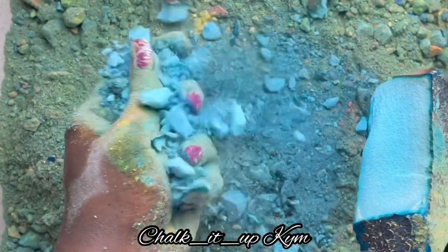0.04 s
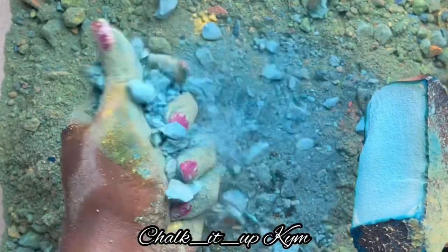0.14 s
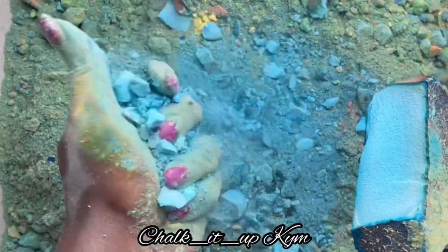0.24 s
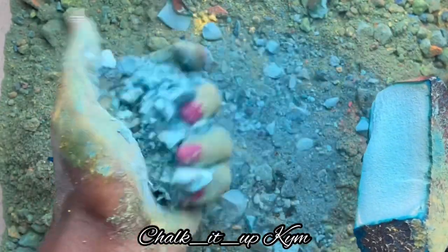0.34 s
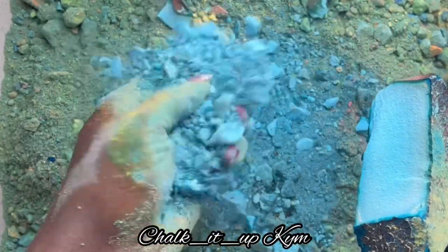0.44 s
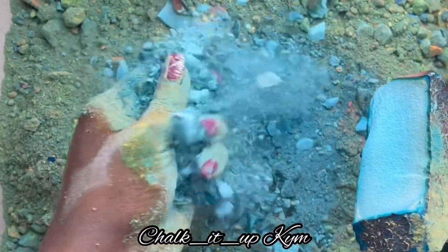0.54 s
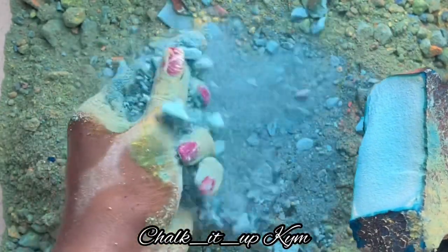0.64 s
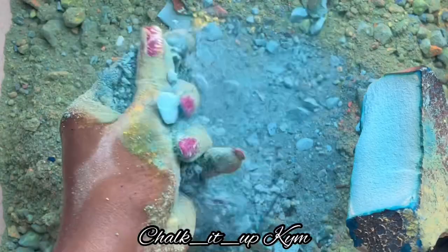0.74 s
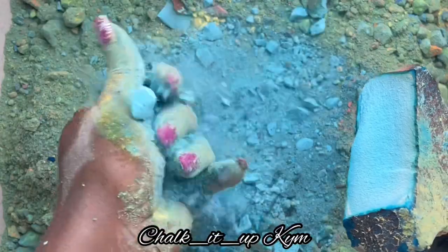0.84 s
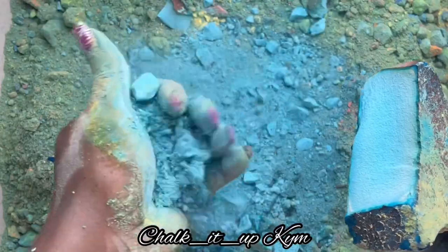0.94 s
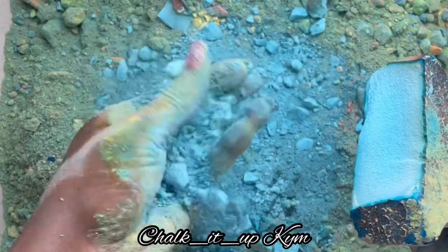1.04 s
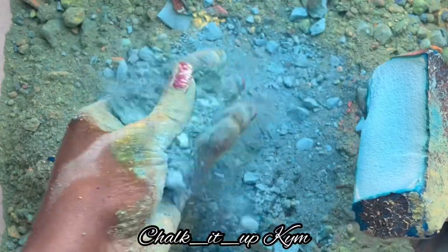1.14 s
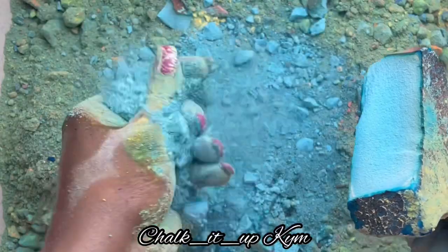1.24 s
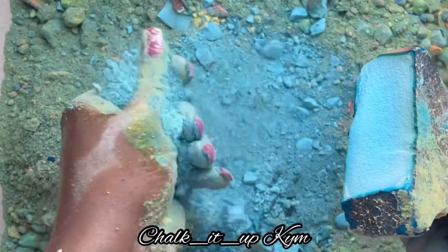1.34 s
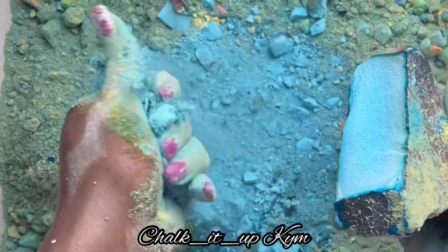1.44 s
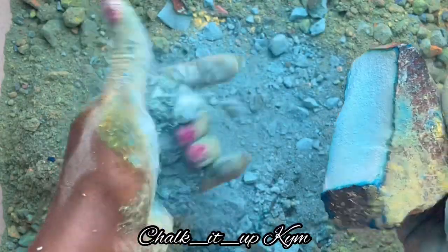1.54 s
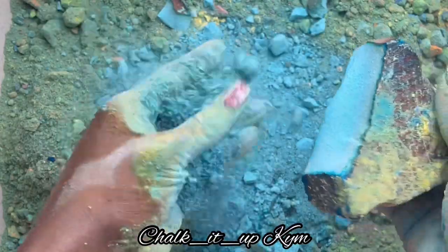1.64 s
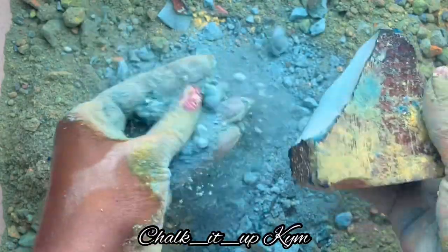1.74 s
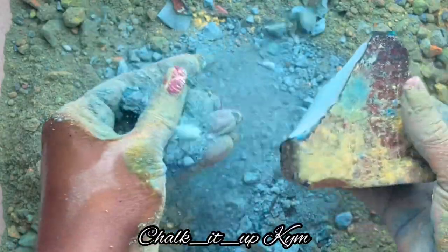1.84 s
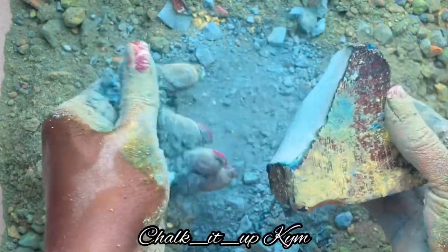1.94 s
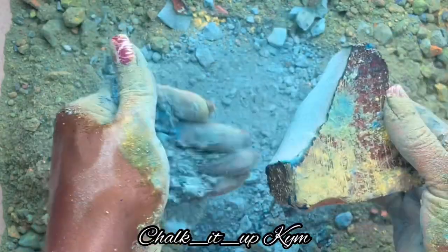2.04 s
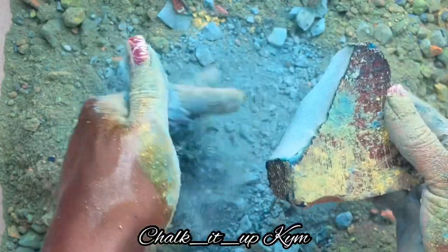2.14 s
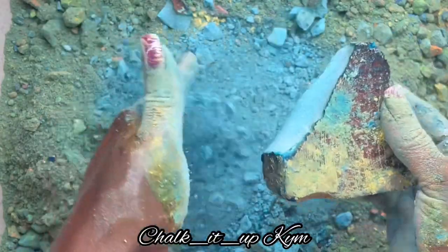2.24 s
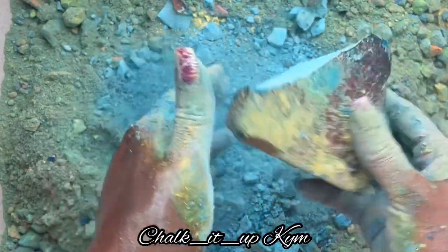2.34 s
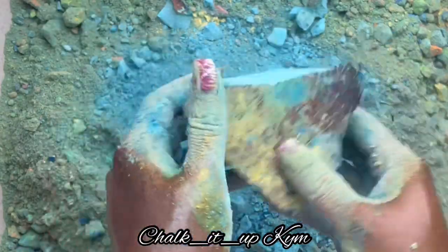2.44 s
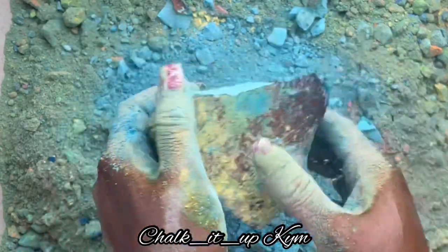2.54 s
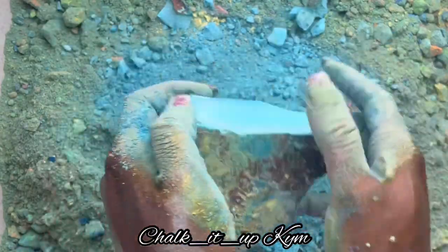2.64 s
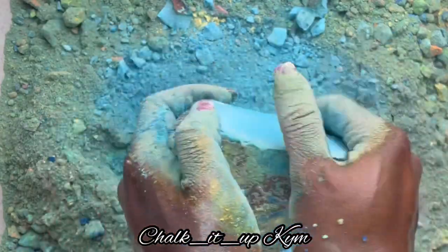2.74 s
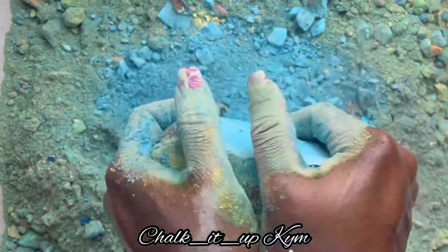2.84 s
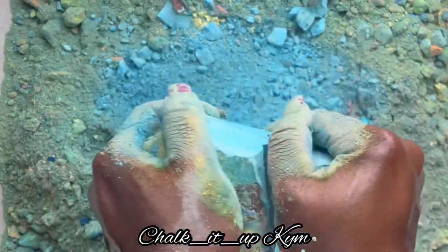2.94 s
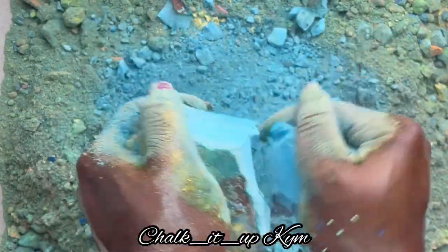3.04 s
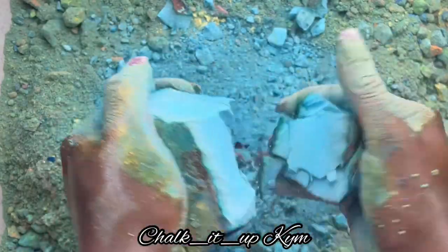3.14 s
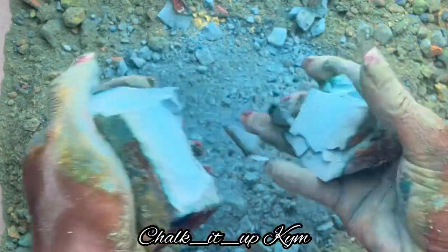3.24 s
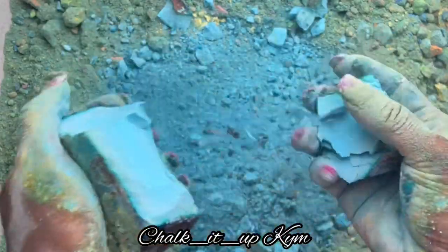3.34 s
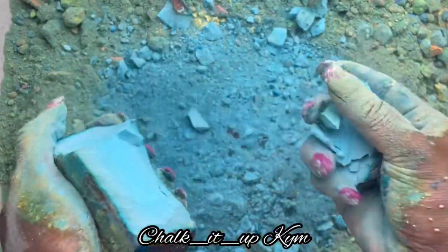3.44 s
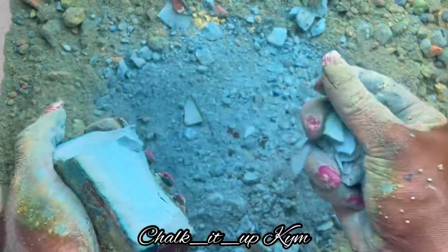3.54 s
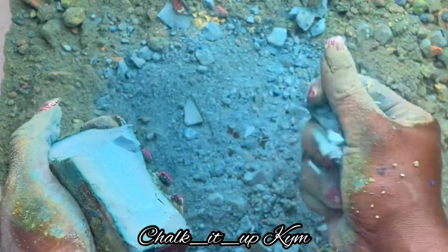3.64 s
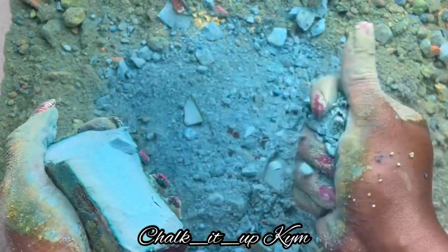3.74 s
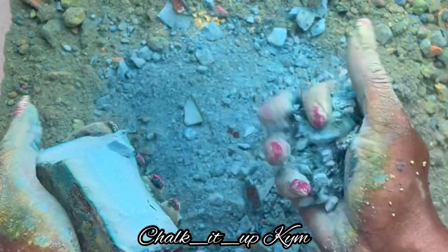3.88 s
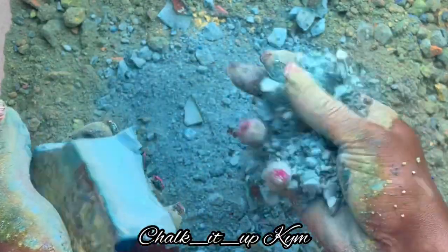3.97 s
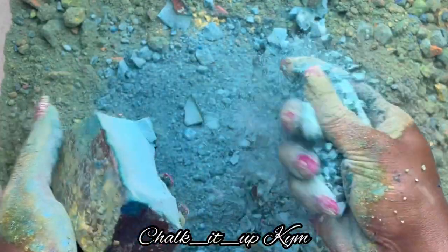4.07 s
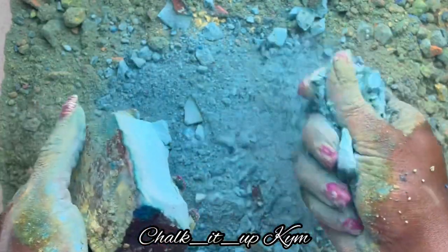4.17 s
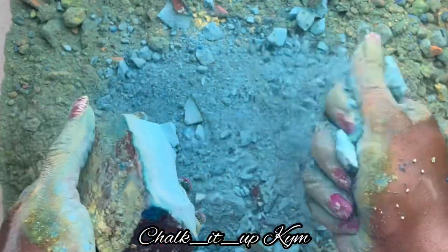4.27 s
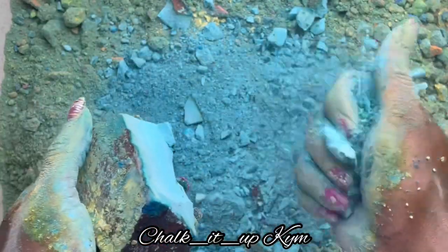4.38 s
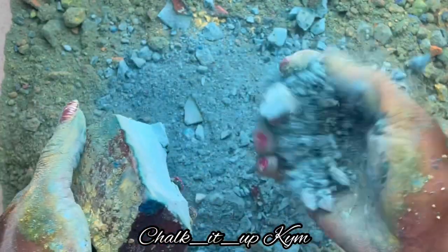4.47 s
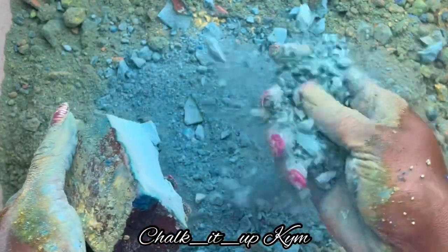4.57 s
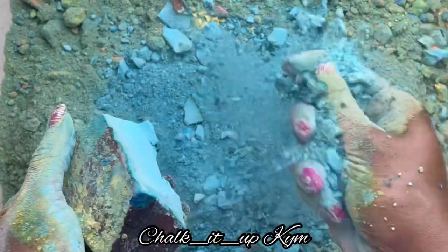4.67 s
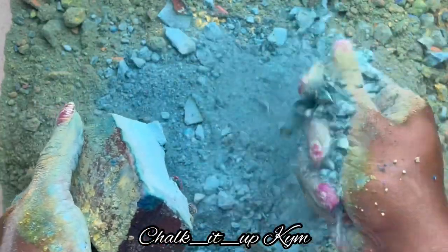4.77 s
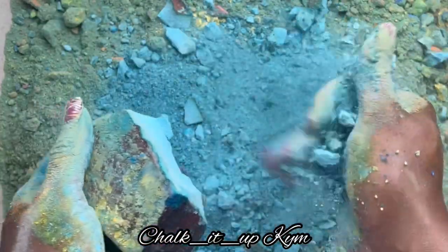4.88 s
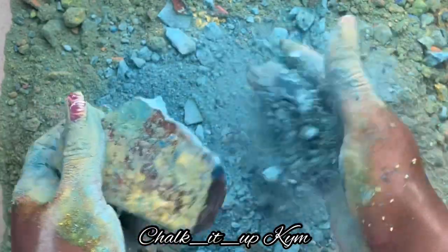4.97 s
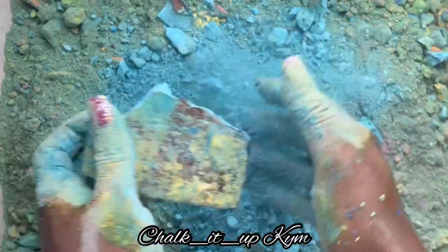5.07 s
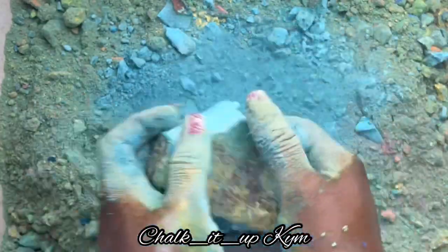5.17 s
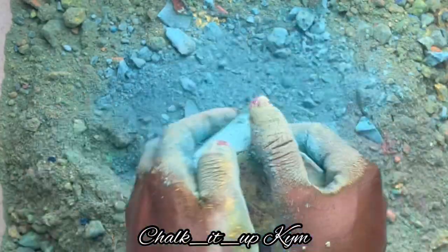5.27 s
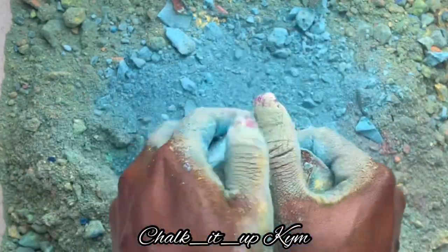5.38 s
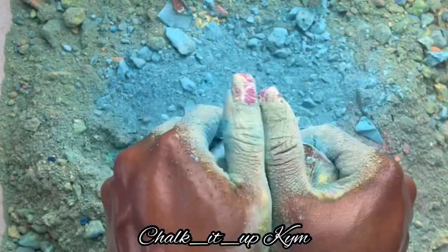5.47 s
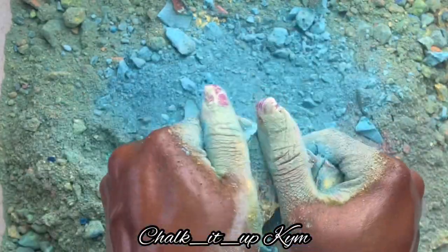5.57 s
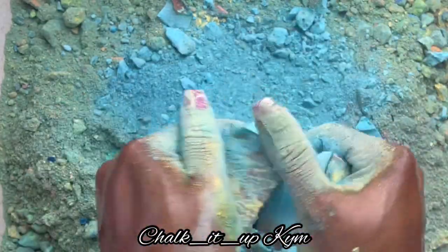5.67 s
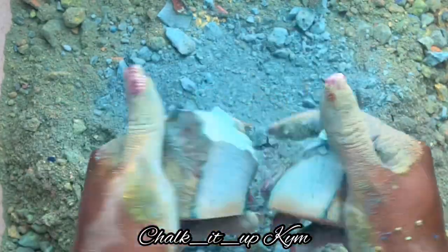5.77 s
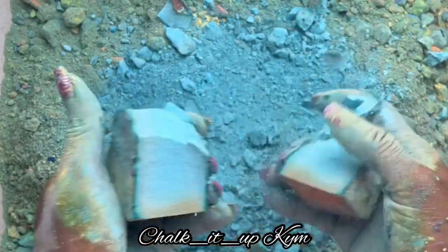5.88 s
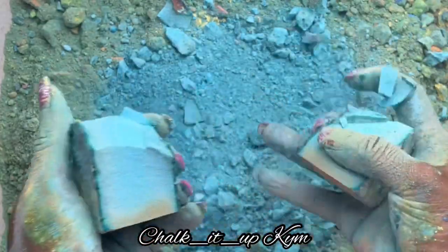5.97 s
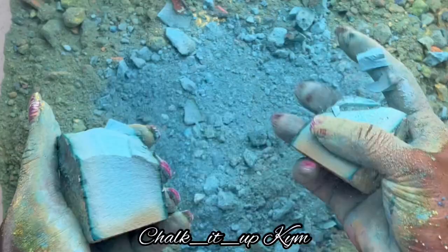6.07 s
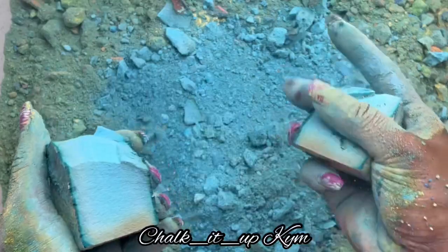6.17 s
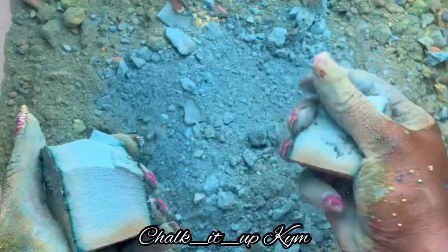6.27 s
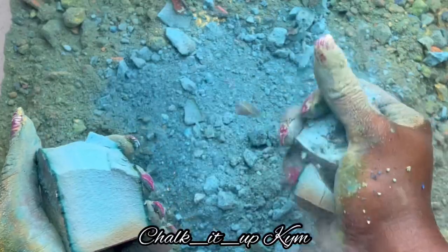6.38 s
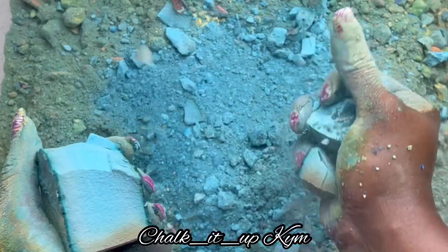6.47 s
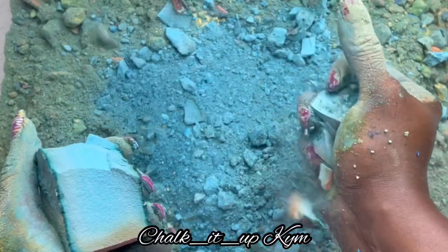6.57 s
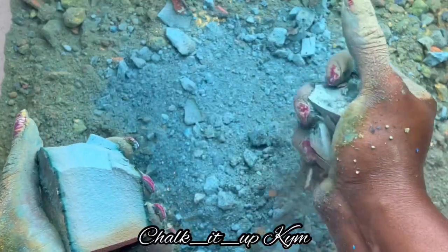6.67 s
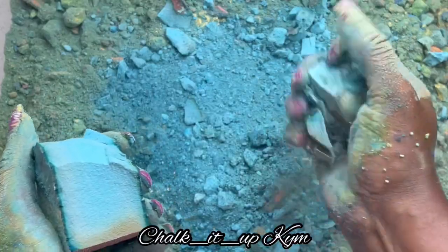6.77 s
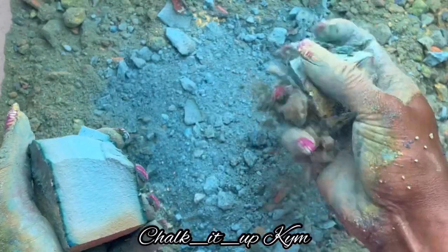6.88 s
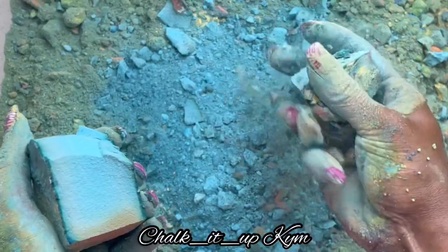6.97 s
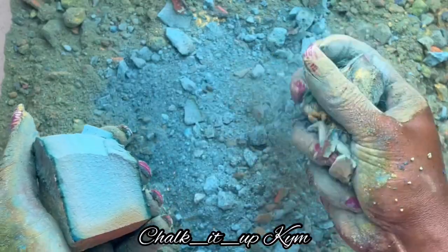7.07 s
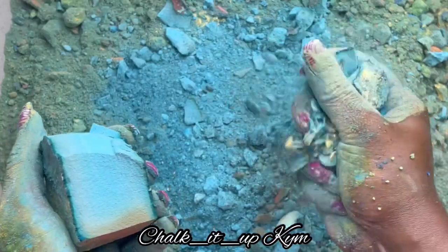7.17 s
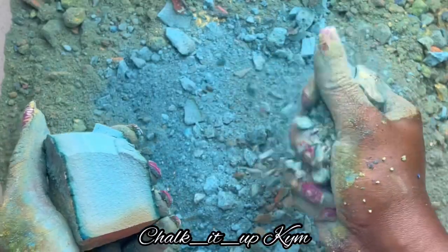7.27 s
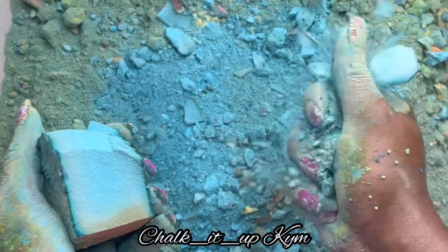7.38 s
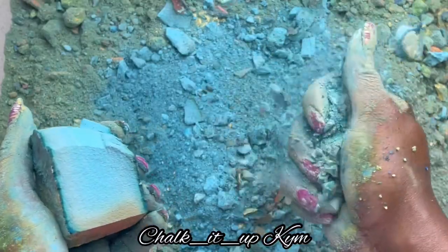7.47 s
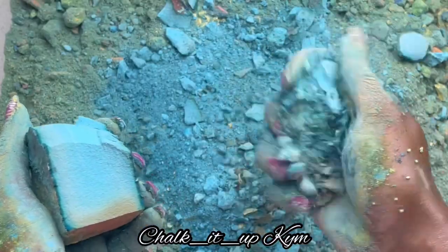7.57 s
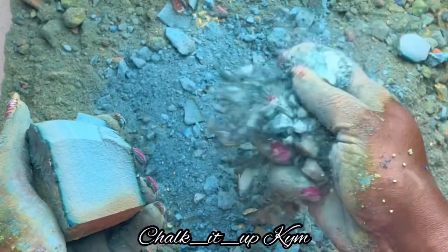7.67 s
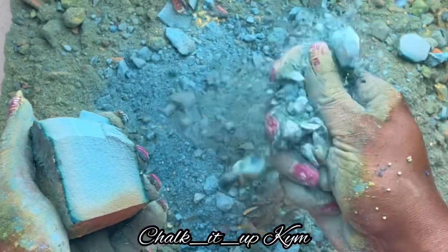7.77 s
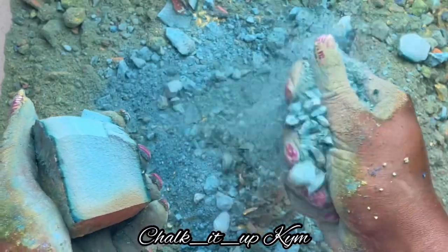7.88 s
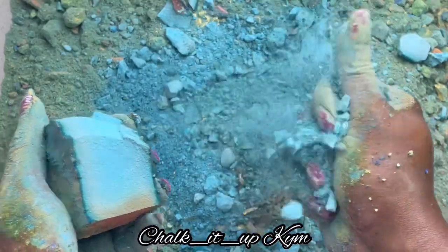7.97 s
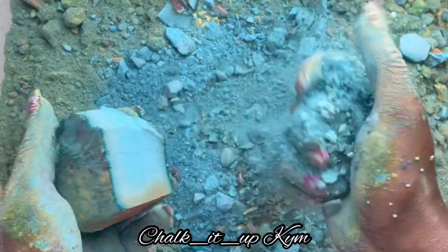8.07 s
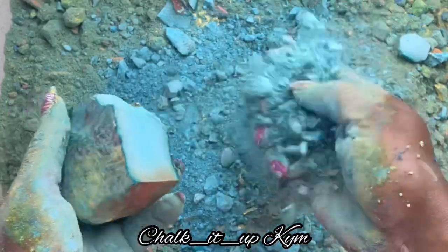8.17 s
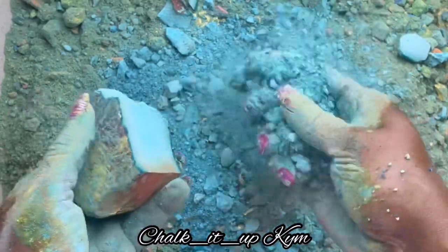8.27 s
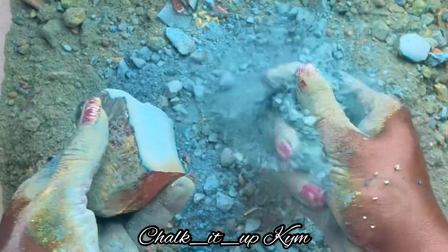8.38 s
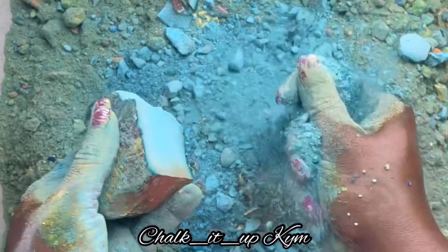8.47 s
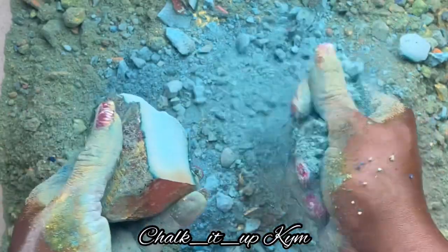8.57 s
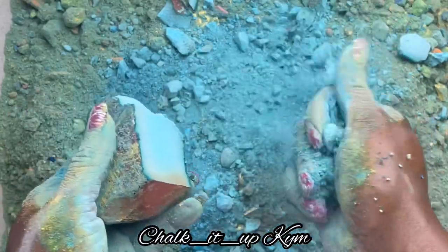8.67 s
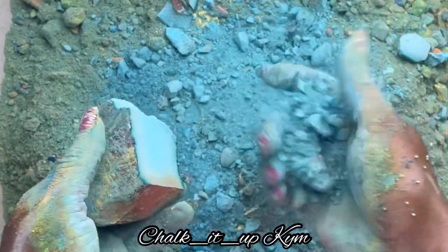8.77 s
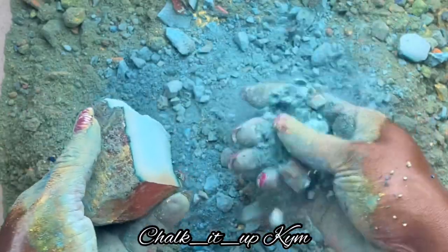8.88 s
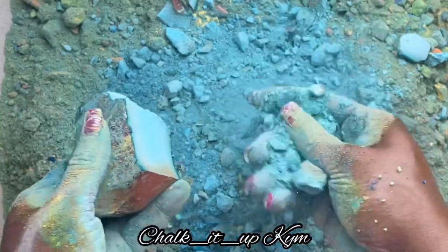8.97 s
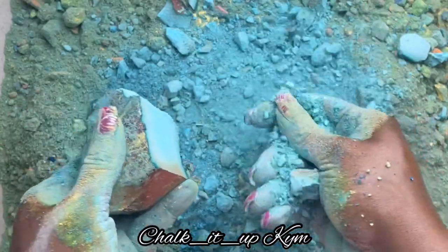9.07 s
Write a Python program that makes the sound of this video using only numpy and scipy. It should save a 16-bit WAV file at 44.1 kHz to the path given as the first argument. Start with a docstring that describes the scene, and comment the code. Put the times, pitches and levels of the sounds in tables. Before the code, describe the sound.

Hands crush chalk close to the microphone in a small room, over a low steady rumble. For the first two seconds, crumbs crunch softly in repeated squeezes, with scattered dry cracks and a sharper one at about 0.6 seconds. Around 2.4 seconds a block slides against skin with a faint hiss and squeak, then snaps with a loud thump near 2.9. The piece crackles and cracks sharply at 3.6, followed by gritty crumbling and a few dull knocks until 5 seconds. After another faint squeaky rub, the block breaks loudly at 5.5, with a sharp crack at 5.7 and a heavy, tearing crunch at 6.3. Quick clusters of cracks follow around 6.5 and from 7 to 7.5 seconds. From there until about 9 seconds, the fist grinds the remains in softer crunches, with small ticks and trickling powder.

```python
"""In a small room, over a powdery table, two hands snap and crush blocks of gym chalk close to a phone.
Brittle fracture releases stored strain: a block parts with a thump and a short tearing burst, and
smaller pieces creak and crack, some with a dull knock. Crumbs grind and trickle, and dry faces hiss
and squeak by friction. The table and the room answer every sound, over a low steady rumble."""
import sys
import numpy as np
from scipy import signal
from scipy.fft import rfft, irfft
from scipy.io import wavfile
from scipy.ndimage import uniform_filter1d

SR = 44100
rng = np.random.default_rng(int(sys.argv[2]) if len(sys.argv) > 2 else 0)


def generate_wav(sig):
    """Save sig (samples, or channels by samples) to the path in sys.argv[1] as 16-bit PCM at SR."""
    pcm = np.round(np.clip(np.atleast_2d(sig).T, -1, 1) * 32767).astype(np.int16)
    wavfile.write(sys.argv[1], SR, pcm)


N = 402191
TIME, BRIEF = np.arange(N) / SR, np.arange(2048) / SR  # seconds: the whole scene, one short event
TOP_HZ = 16000
SLIDE_RELEASE_S = 0.012  # the hiss stops with the movement

# Pieces cracking. Each row: start in seconds, pulse level in dB, pitch in Hz, grit in dB re the pulse.
CRACKS = [(0.049, -14.5, 1380, -11), (0.0806, -23, 1980, -6), (0.177, -19.5, 2020, -4.5),
          (0.193, -24, 1510, -5), (0.2222, -31, 1500, -14), (0.2458, -28, 1340, -2.5),
          (0.3472, -28, 2700, -1.5), (0.4362, -28.5, 980, -25), (0.4926, -28, 670, -21),
          (0.634, -11.5, 2240, -10.5), (0.7238, -25.5, 1380, -11), (0.8105, -26.5, 1190, -17),
          (0.841, -25, 1600, -2), (1.168, -17.5, 1390, -38), (1.39, -22, 1260, -24),
          (1.6771, -20, 1740, -28), (1.793, -22.5, 1540, -22), (1.8054, -19, 1230, -28),
          (1.908, -22, 2680, -22), (1.9537, -26.5, 1870, -13), (2.012, -33.5, 1870, -15),
          (2.1582, -34, 920, 7), (2.2491, -20.5, 1680, -2), (2.742, -24, 6750, -3.5),
          (2.9259, -13.5, 1730, -8), (2.9338, -13, 1380, -9), (2.9747, -27, 2480, -9),
          (3.428, -21.5, 4440, -4), (3.4572, -30.5, 2200, 9.5), (3.4762, -18.5, 3350, -2.5),
          (3.5017, -19.5, 2140, 0), (3.518, -24.5, 4800, -1), (3.5755, -31, 2410, 1),
          (3.6106, -12.5, 3200, -3), (3.6188, -6, 4470, -4.5), (3.8884, -21.5, 1210, -8.5),
          (3.8974, -24.5, 1300, -24), (4.298, -35, 3200, 3), (4.4534, -23.5, 2140, -7),
          (4.557, -29, 1570, -8), (4.644, -27.5, 1710, -8), (5.0343, -24, 1020, -23),
          (5.1224, -29.5, 1940, -0.5), (5.5381, -16, 1140, -21), (5.7029, -6.5, 1990, -7),
          (5.7083, -13.5, 1330, -7.5), (5.9422, -21.5, 1180, -12), (6.29, -21.5, 1580, -9),
          (6.3057, -28, 2200, -3), (6.319, -19, 1240, -27), (6.3921, -20, 2030, -4.5),
          (6.4881, -29, 2020, -2), (6.4988, -24.5, 1950, 1), (6.5179, -9, 3320, -5),
          (6.5222, -11, 2020, -4), (6.543, -23.5, 2870, 0.5), (6.5867, -23.5, 1320, 3),
          (6.7278, -22, 1390, -30), (6.7456, -27.5, 2480, -2.5), (6.9972, -34.5, 2440, 14.5),
          (7.0254, -18.5, 2700, 0), (7.047, -18.5, 1890, -7), (7.0627, -29, 2380, 8),
          (7.1272, -12, 1710, -1), (7.1443, -13, 1590, -6), (7.1636, -12.5, 2750, -6.5),
          (7.2775, -16.5, 1950, -0.5), (7.302, -14.5, 3020, 1.5), (7.3208, -15, 2100, -3),
          (7.3293, -20, 2050, -2), (7.348, -19, 2100, -12), (7.36, -17.5, 1690, -0.5),
          (7.401, -28, 1800, -3), (7.5417, -19, 1250, -5), (7.57, -25.5, 1550, 3.5),
          (7.8, -16.5, 1390, -31), (7.9828, -20.5, 1750, -2), (8.01, -24.5, 1290, -12),
          (8.127, -25.5, 1500, -13), (8.343, -19, 1350, -33), (8.4408, -28, 1820, -5),
          (8.4735, -27.5, 1940, -0.5), (9.015, -26, 1620, -13)]
# Spectrum of the grit from a fresh fracture. Each row: frequency in Hz, relative level in dB.
GRIT_SPECTRUM = [(200, -7.5), (800, 3.5), (2000, 7.5), (4000, 6), (7000, 0), (9000, 1.5), (12000, -6),
                 (16000, -9.5)]
# Spectrum of sliding powder. Each row: frequency in Hz, relative level in dB.
POWDER_SPECTRUM = [(300, -0.5), (1500, -14), (3300, 2.5), (5000, -1.5), (7000, -0.5), (9000, 1.5),
                   (11500, -3.5), (16000, -9.5)]
# Dry faces sliding over skin or each other. Each row: start, attack and hold in seconds, level in dB.
SLIDES = [(2.325, 0.09, 0.059, -42.5), (2.695, 0.0031, 0.0046, -35), (2.725, 0.013, 0.065, -48),
          (2.847, 0.013, 0.047, -46), (3.176, 0.048, 0.27, -49.5), (3.418, 0.052, 0.12, -45),
          (4.05, 0.021, 0.16, -46.5), (5.182, 0.0074, 0.037, -46), (5.235, 0.043, 0.063, -38),
          (5.653, 0.027, 0.04, -40), (5.797, 0.071, 0.012, -50), (5.965, 0.013, 0.011, -38),
          (6.003, .005, 0.037, -53), (6.118, 0.084, 0.0024, -42), (6.77, 0.067, 0.049, -46),
          (7.902, 0.04, 0.033, -45), (8.416, 0.039, 0.034, -50.5)]


def undb(db):
    """Amplitude grows tenfold for every 20 dB."""
    return 10 ** (np.asarray(db) / 20)


def unit(x):
    """Normalisation to an rms of 1."""
    return x / np.sqrt(np.mean(x ** 2))


def unit_energy(x):
    """Normalisation to the energy of one millisecond at an rms of 1."""
    return x * np.sqrt(SR / 1000 / np.sum(x ** 2))


def colour(x, points):
    """Spectral shaping by a curve through points of frequency in Hz and gain in dB."""
    hz, db = np.transpose(points)
    f = np.maximum(np.fft.rfftfreq(len(x), 1 / SR), 1)
    return irfft(rfft(x) * undb(np.interp(np.log(f), np.log(hz), db)), len(x))


def noise(points, size):
    """Filtered Gaussian noise with an rms of 1."""
    return unit(colour(rng.standard_normal(size), points))


def wander(rate):
    """Random modulation that glides to a new value `rate` times a second."""
    knots = rng.standard_normal(int(N / SR * rate) + 2)
    return np.interp(TIME * rate, np.arange(len(knots)), knots)


def add(track, s, sound):
    """Superposition: a sound joins the track at s seconds."""
    i = max(int(s * SR), 0)
    track[i:i + len(sound)] += sound[:max(N - i, 0)]


def strokes(rows, release_s):
    """Hand movements add in power; each envelope rises, holds and decays exponentially."""
    power = np.zeros(N)
    for start, attack_s, hold_s, db in rows:
        age = TIME - start
        release = np.exp(-np.maximum(age - attack_s - hold_s, 0) / release_s)
        power += (undb(db) * np.clip(age / attack_s, 0, 1) * release) ** 2
    return np.sqrt(power)


def rumble(bass_hz=85, floor_db=-45.5):
    """Ambient noise: the room hums and hisses steadily while its deepest part swells and sinks."""
    # Room noise. Each row: frequency in Hz, relative spectral density in dB.
    spectrum = [(20, -5), (35, -11), (52, 9.5), (75, -5), (115, -7), (140, -6.5), (175, -12.5), (370, -14),
                (580, -25), (2200, -31), (5000, -72), (9500, -41), (16000, -38)]
    # Swell of the bass. Each row: time in seconds, level in dB.
    bass_levels = [(0.0, -48), (2.05, -54.5), (4.8, -50), (5.9, -52), (7.2, -45), (7.9, -54)]
    floor = noise(spectrum, N) * undb(floor_db + 0.3 * wander(3.9))
    bass = signal.sosfiltfilt(signal.butter(4, bass_hz, fs=SR, output="sos"), floor)
    s, db = np.transpose(bass_levels)
    return floor - bass + unit(bass) * undb(np.interp(TIME, s, db))


def pulse(hz, cycles):
    """Damped oscillation: chalk and skin stop released strain in a swing or two; its change radiates."""
    turns = BRIEF * hz
    swing = -np.sin(2 * np.pi * turns) * turns ** 0.96 * np.exp(-turns / cycles)
    return unit_energy(np.gradient(swing))


def grit_colour(hz, follow=0.17):
    """Size scaling: smaller, higher pieces spit brighter grit; the top of the spectrum stays put."""
    f, db = np.transpose(GRIT_SPECTRUM)
    return np.transpose([f * (hz / 1900) ** (follow * (1 - f / TOP_HZ)), db])


def cupped(direct, echo_db=-8, decay_s=0.0048):
    """Cavity resonance: the cupped hand rings briefly, and as it moves no two echoes are alike."""
    # Air trapped between palms and table. Each row: frequency in Hz, relative level in dB.
    cavity = [(120, 7), (240, -0.5), (420, -29), (860, 0.5), (1380, -4), (1680, -12.5), (2050, 5.5),
              (2550, -7), (3800, -2), (16000, -9)]
    response = noise(cavity, len(BRIEF)) * np.exp(-BRIEF / decay_s) * (1 - np.exp(-BRIEF / 0.00038))
    echo = signal.fftconvolve(direct, response / np.linalg.norm(response))[:len(BRIEF)]
    return direct + undb(echo_db) * echo


def crack(hz, grit_db, cycles=0.21, grit_s=0.0015):
    """Brittle fracture: a piece gives way with a pulse centred on its pitch and a spit of grit."""
    grit = unit_energy(noise(grit_colour(hz), len(BRIEF)) * np.exp(-BRIEF / grit_s))
    swing_hz = hz / np.hypot(1, 1 / (2 * np.pi * cycles))  # damping lifts the spectral peak back to hz
    return cupped(pulse(swing_hz, cycles) + undb(grit_db) * grit)


def crumbling(settle_s=0.088, debris_s=0.022, trickle_db=-62):
    """Incoherent sum: squeezes, cracks, slides and a constant trickle set the amplitude of the crumbs."""
    # Fingers working crumbs in the fist. Each row: start, attack and hold in seconds, level in dB.
    squeezes = [(0.0, 0.0006, 0.084, -37), (0.14, 0.015, 0.12, -44), (0.34, 0.016, 0.21, -43.5),
                (0.563, 0.0077, 0.014, -35), (0.69, 0.0092, 0.17, -39.5), (1.1, 0.0064, 0.17, -42.5),
                (1.35, 0.017, 0.03, -41.5), (1.475, 0.0061, 0.095, -48), (1.715, 0.043, 0.059, -41.5),
                (1.885, 0.012, 0.025, -40.5), (2.15, 0.0088, 0.015, -43.5), (3.39, 0.044, 0.04, -47.5),
                (3.63, 0.024, 0.045, -41), (3.76, 0.074, 0.033, -44), (3.99, 0.029, 0.28, -42.5),
                (4.445, 0.0065, 0.023, -44), (4.54, 0.09, 0.086, -40.5), (4.76, 0.057, 0.041, -42),
                (4.94, 0.032, 0.081, -43.5), (6.72, 0.013, 0.16, -48), (6.99, 0.037, 0.27, -40.5),
                (7.26, 0.026, 0.025, -37), (7.535, 0.0016, 0.088, -40), (7.68, 0.058, 0.069, -38),
                (7.87, 0.071, 0.023, -42.5), (8.06, 0.019, 0.088, -44), (8.25, 0.11, 0.017, -35),
                (8.53, 0.072, 0.075, -47), (8.87, 0.04, 0.17, -45.5)]
    shed = np.zeros(N)
    for s, db, _, _ in CRACKS:
        add(shed, s, undb([min(db - 26, -47)]) ** 2)  # debris follows its crack's level, up to a cap
    debris_power = signal.lfilter([1], [1, -np.exp(-2 / (debris_s * SR))], shed)
    rubbed_off = undb(-9) * strokes(SLIDES, SLIDE_RELEASE_S)
    squeezed = strokes(squeezes, settle_s)
    return np.sqrt(squeezed ** 2 + debris_power + rubbed_off ** 2 + undb(trickle_db) ** 2)


def crumbs(squeeze, per_s=3000, middle_hz=1500, sizes=24, spread_db=3.9, cluster_db=3.7):
    """Shot noise: tiny cracks of many sizes merge into a dense, soft crunch as the fist works."""
    # Colour of the crunch. Each row: frequency in Hz, relative gain in dB.
    spectrum = [(100, 14.5), (200, 15), (400, 8.5), (600, -2), (860, -5), (1300, 1.5), (2000, 1.5),
                (3000, 1), (4600, -3), (8700, 5), (11000, -2), (16000, -6)]
    out, clusters = 0, undb(cluster_db * wander(70))
    for size in np.linspace(-1, 1, sizes):  # from large and low to small and gritty
        happens = rng.random(N) < per_s / sizes / SR
        strength = undb(spread_db * np.minimum(rng.exponential(size=N), 3.5)) * rng.choice([-1, 1], N)
        hz = middle_hz * np.exp(0.53 * np.sinh(1.206 * size))
        out = out + signal.oaconvolve(happens * strength * clusters, crack(hz, -7 + 6 * size))[:N]
    out = colour(out, spectrum)
    running_rms = np.sqrt(uniform_filter1d(out ** 2, int(.06 * SR)) + 1e-12)
    return out / running_rms * squeeze


def crumb_ticks(squeeze, per_s=33, middle_hz=2500):
    """Sparse random impulses: lone crumbs pop or land with a dry tick, the small ones mostly grit."""
    out = np.zeros(N)
    for when, strength, size in rng.random((int(per_s * N / SR), 3)):
        small = 2 * size - 1
        db = 2.5 + 2.3 * min(-np.log(1 - strength), 3) - 3 * small
        tick = crack(middle_hz * 2 ** small, grit_db=7 * small - 3, grit_s=0.0007)
        add(out, when * N / SR, squeeze[int(when * N)] * undb(db) * tick)
    return out


def friction_noise(rough_db, grain_db=4):
    """Amplitude modulation gives white noise a fine grain and a slower roughness."""
    return rng.standard_normal(N) * undb(grain_db * wander(1500) + rough_db * wander(110))


def powder_hiss(squeeze, re_crumbs_db=-12, rest_db=-57):
    """Granular friction: powder slides in the fist with an uneven hiss, faint when the hand rests."""
    hiss = unit(colour(friction_noise(rough_db=3.5), POWDER_SPECTRUM))
    return hiss * np.hypot(undb(re_crumbs_db) * squeeze, undb(rest_db))


def cracks(jolt_hz=430, jolt_db_per_octave=-9):
    """Fracture and recoil: each distinct crack jolts the fingers, small high pieces least."""
    out = np.zeros(N)
    for s, db, hz, grit_db in CRACKS:
        cycles = np.interp(db, [-28, -12], [0.22, 0.42])  # a hard snap frees the piece to swing longer
        jolt_db = min(db - 6, -27) + jolt_db_per_octave * max(np.log2(hz / 1600), 0)
        add(out, s, undb(db) * crack(hz, grit_db, cycles))
        add(out, s, undb(jolt_db) * pulse(jolt_hz, cycles=0.25))
    return out


def splintering(lag_s=0.014, count=3):
    """Fracture cascade: a gritty break runs on in a few smaller, higher cracks."""
    out = np.zeros(N)
    for s, db, hz, grit_db in CRACKS:
        for wait, small in rng.random((count, 2)):
            delay_s = lag_s * (.5 - np.log(1 - wait))
            splinter_db = db + grit_db - 17 * (1 + small / 2)
            add(out, s + delay_s, undb(splinter_db) * crack(hz * (1 + small), grit_db=0))
    return out


def bumps(hz=170, soft_s=0.0098):
    """Cushioned impact: the bed of powder spreads each landing into a short low patter."""
    # Knuckles and lumps landing. Each row: start in seconds, level in dB.
    landings = [(0.065, -35), (2.42, -34.5), (8.125, -30)]
    envelope = BRIEF * np.exp(-BRIEF / soft_s) * (1 - BRIEF / BRIEF[-1])
    out = np.zeros(N)
    for s, db in landings:
        patter = noise([(0.3 * hz, -18), (hz, 0), (2 * hz, -8), (6 * hz, -40)], len(BRIEF))
        add(out, s, undb(db) * unit_energy(patter * envelope))
    return out


def knocks(cycles=0.43, overtone=2.47, overtone_db=-7, grit_db=-6, grit_s=0.004):
    """Heavy damping: two low tones die at once in a dull, hollow knock with a little grit."""
    # Dull low knocks: the low body of some cracks, and a few lone chunk knocks.
    # Each row: start in seconds, level in dB, pitch in Hz.
    low_knocks = [(0.634, -26, 485), (1.168, -26, 446), (3.7488, -27, 342), (4.4532, -32.5, 650),
                  (4.679, -24.5, 644), (5.436, -28.5, 396), (7.5372, -26, 555), (7.8, -26.5, 750),
                  (8.0173, -30.5, 1150), (9.045, -32.5, 616)]
    out = np.zeros(N)
    for s, db, hz in low_knocks:
        grit = unit_energy(noise(GRIT_SPECTRUM, len(BRIEF)) * np.exp(-BRIEF / grit_s))
        tones = pulse(hz, cycles) + undb(overtone_db) * pulse(overtone * hz, cycles)
        add(out, s, undb(db) * cupped(tones + undb(grit_db) * grit))
    return out


def breaks(dust_db=-21, dust_s=0.029, sharp_s=0.0011, piece_hz=800):
    """Crack propagation: tiny slips run through a thick piece; the halves recoil and shed dust."""
    # Thick pieces parting. Each row: start in seconds, thump pitch in Hz, thump level in dB,
    # tearing time in seconds, tearing level in dB.
    partings = [(1.8046, 303, -18, 0.00056, -38), (2.9246, 244, -4, 0.0056, -17.5),
                (3.6088, 192, -16.5, 0.011, -48), (5.0343, 187, -19, 0.0027, -35),
                (5.5374, 263, -5, 0.0035, -15.5), (5.703, 334, -20, 0.021, -27),
                (6.3334, 122, -6, 0.0076, -9), (6.5183, 175, -16, 0.007, -20),
                (7.128, 210, -16.5, 0.01, -23)]
    out, t = np.zeros(N), np.arange(8192) / SR
    for s, hz, thump_db, tear_s, tear_db in partings:
        running = np.exp(-(2 * (t - 0.55 * tear_s) / tear_s) ** 2)
        dust = undb(dust_db) * np.exp(-t / dust_s) * (t > tear_s / 2)
        slips = rng.laplace(size=len(t))
        grit = unit(colour(slips, grit_colour(piece_hz))) * (running + dust)
        edge = unit(slips) * running * (sharp_s / tear_s) ** 2  # a faster fracture is brighter
        add(out, s, undb(thump_db) * pulse(hz, cycles=0.26))
        add(out, s, undb(tear_db) * (grit + edge))
    return out


def swishes(spacing_hz=330, ripple_db=3.8, bright_db_per_octave=0.3):
    """Sliding friction excites resonances of the gap between skin and block, new for each slide."""
    hz = np.arange(spacing_hz, TOP_HZ, spacing_hz)
    f, db = np.transpose(POWDER_SPECTRUM)
    smooth_db = np.interp(np.log(hz), np.log(f), db) + bright_db_per_octave * np.log2(hz)
    friction = friction_noise(rough_db=4)
    out = np.zeros(N)
    for slide in SLIDES:
        start = slide[0]
        span = slice(int(start * SR), int(start * SR) + SR // 2)
        gap_db = smooth_db + ripple_db * np.clip(rng.standard_normal(len(hz)), -2, 2)
        rasp = unit(colour(friction[span], np.transpose([hz, gap_db])))
        add(out, start, rasp * strokes([slide], SLIDE_RELEASE_S)[span])
    return out


def squeaks(jitter=0.03, slips_per_s=520, rough_db=3.0):
    """Stick-slip oscillation: flat faces sound hoarse partials that drift slightly through a stroke."""
    # Block faces squeaking. Each row: start and end in seconds, pitch in Hz,
    # fall as a share of the pitch (negative rises), level in dB.
    rubs = [(2.349, 2.492, 3740, -0.04, -46), (2.853, 2.88, 12400, 0.04, -37.5),
            (3.213, 3.35, 4030, 0.019, -51.5), (5.26, 5.402, 2980, 0.043, -43)]
    # Inharmonic partials. Each row: multiple of the pitch, relative level in dB.
    partials = [(0.87, -14), (1, 0), (1.168, -9), (1.6, -7), (2.27, -9)]
    out = np.zeros(N)
    for start, end, hz, fall, db in rubs:
        progress = np.linspace(0, 1, int((end - start) * SR))
        pitch, tone = hz * (1 + fall * (.5 - progress)), 0
        for ratio, partial_db in partials:
            if ratio * hz < TOP_HZ:
                partial_hz = ratio * pitch * (1 + jitter * wander(slips_per_s)[:len(progress)])
                tone = tone + undb(partial_db) * np.sin(2 * np.pi * np.cumsum(partial_hz) / SR)
        roughness = undb(rough_db * wander(slips_per_s)[:len(progress)])
        add(out, start, undb(db) * unit(tone * roughness) * np.sin(np.pi * progress))
    return out


def creaks(lower_ratio=0.658, lower_db=-4, wobble_rad=0.6, wobble_hz=900, grit_db=-11):
    """Uneven stick-slip drives two tones of a wedged piece for a few milliseconds and spits grit."""
    # Wedged pieces giving way. Each row: start and length in seconds, pitch in Hz, level in dB.
    slips = [(2.9273, 0.014, 1800, -16), (3.5984, 0.003, 2090, -12), (3.6105, 0.006, 1976, -7),
             (7.1258, 0.0058, 1700, -14.5), (7.537, 0.0089, 1400, -22)]
    out = np.zeros(N)
    for s, length_s, hz, db in slips:
        phase = 2 * np.pi * hz * BRIEF + wobble_rad * wander(wobble_hz)[:len(BRIEF)]
        tones = np.sin(phase) + undb(lower_db) * np.sin(lower_ratio * phase)
        swell = np.sin(np.pi * np.minimum(BRIEF / length_s, 1) ** 0.8)
        grit = undb(grit_db) * noise(GRIT_SPECTRUM, len(BRIEF)) * (1 + np.cos(phase))
        add(out, s, undb(db) * cupped(swell * (tones + grit)))
    return out


def room(x, low_db=-14, low_t60=0.24, high_db=-12.0, high_t60=0.14):
    """Resonance and reverberation: the table rings briefly, and lows last longest in the room's tail."""
    # Modes of the table and the air above it. Each row: frequency in Hz, T60 in seconds, gain in dB.
    table_modes = [(126.4, 0.31, -6), (218, 0.096, -4), (737, 0.057, -1.5), (1396, 0.071, -3),
                   (1940, 0.026, -19.5), (5730, 0.0034, -6.5)]
    t = np.arange(SR // 2) / SR
    lows = noise([(40, -14), (130, -18), (330, -12.5), (700, -19.0), (6000, -61)], len(t))
    highs = noise([(900, -0.69), (2200, -1.2)], len(t))
    onset = 1 - np.exp(-t / 0.0072)
    response = np.zeros(len(t))
    for band, db, t60, width_hz in ((lows, low_db, low_t60, 500), (highs, high_db, high_t60, 8000)):
        tail = band * onset * np.exp(-np.log(1000) * t / t60)
        response += undb(db) * tail / np.linalg.norm(tail) * np.sqrt(2 * width_hz / SR)
    for hz, t60, db in table_modes:
        fade = np.exp(-np.log(1000) * t / t60)
        response += 2 * undb(db) * np.cos(2 * np.pi * hz * t) * fade / fade.sum()
    response[0] += 1  # the direct path
    return signal.fftconvolve(x, response)[:N]


def scene():
    """Superposition: fracture, impact and friction sound in one room, over its rumble."""
    squeeze = crumbling()
    blows = cracks() + splintering() + creaks() + breaks() + knocks() + bumps()
    friction = crumbs(squeeze) + crumb_ticks(squeeze) + powder_hiss(squeeze) + swishes() + squeaks()
    return (room(blows + friction) + rumble())[None]


def record(dry):
    """Soft saturation and band limiting: the phone rounds the loudest snaps and cuts the top."""
    ceiling = 1.2
    rounded = ceiling * np.tanh(dry / ceiling)
    return signal.sosfilt(signal.ellip(8, .2, 70, TOP_HZ, fs=SR, output="sos"), rounded)


dry = scene()
out = record(dry)
generate_wav(out)
```